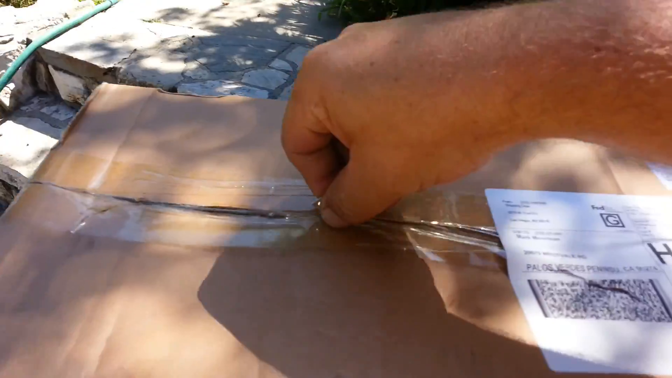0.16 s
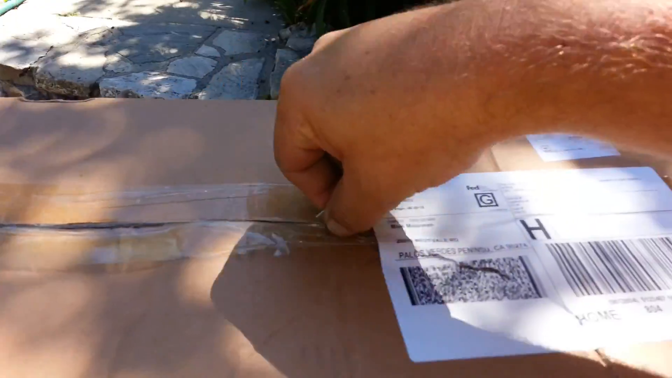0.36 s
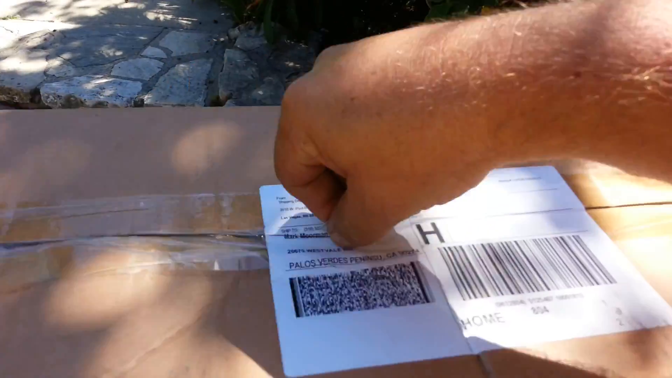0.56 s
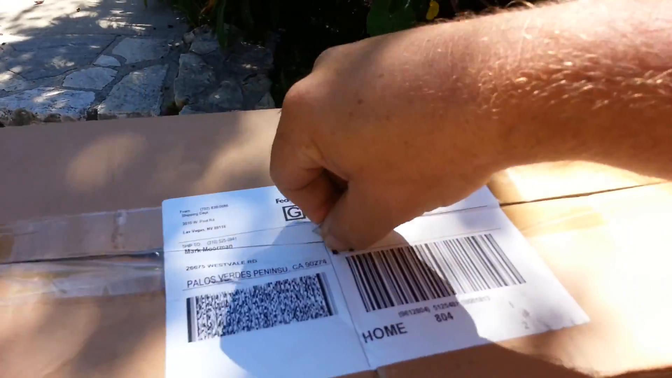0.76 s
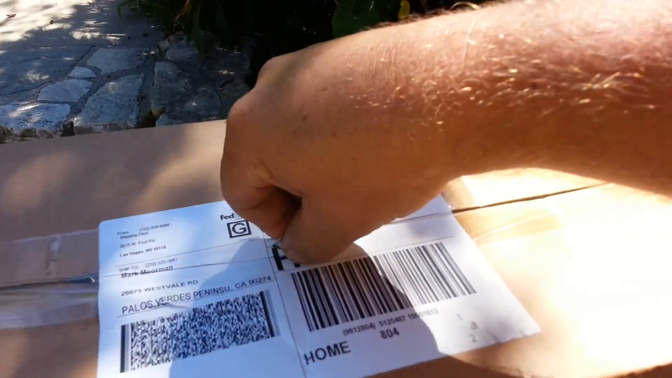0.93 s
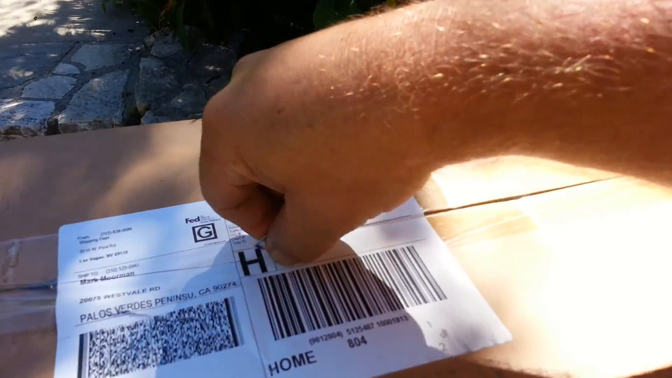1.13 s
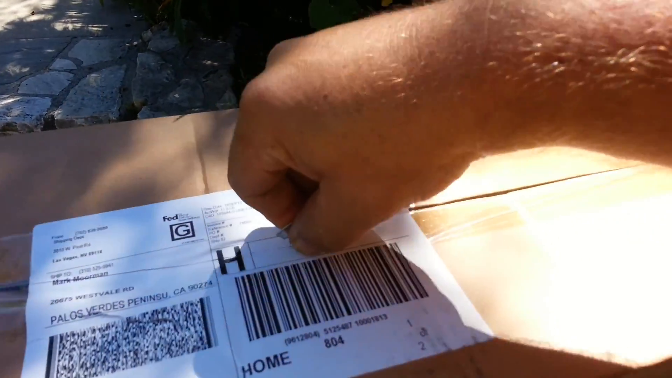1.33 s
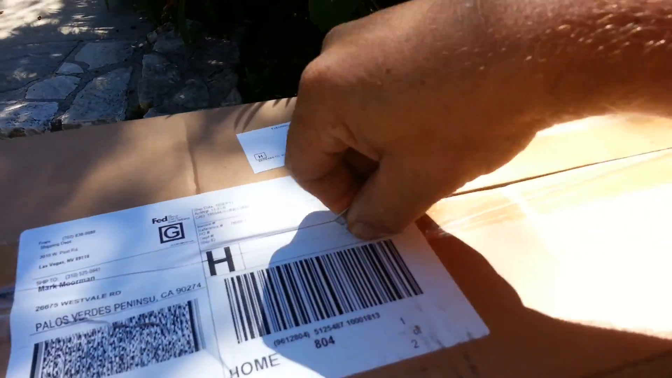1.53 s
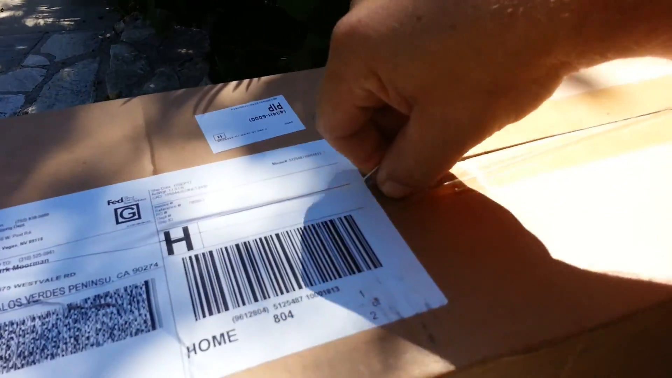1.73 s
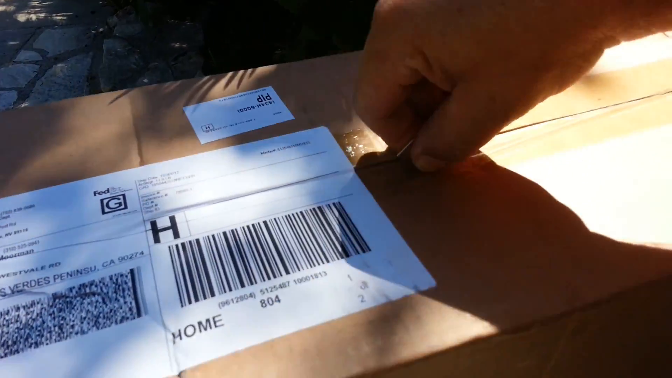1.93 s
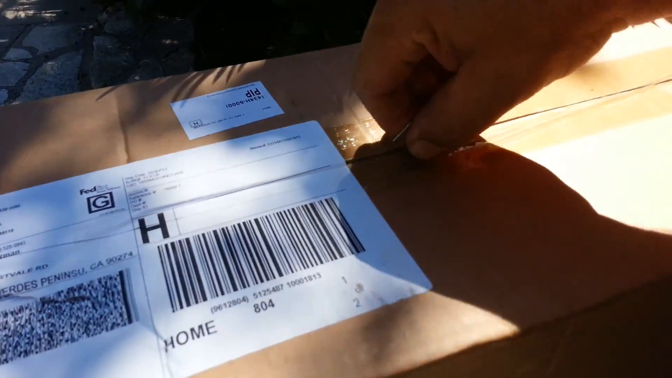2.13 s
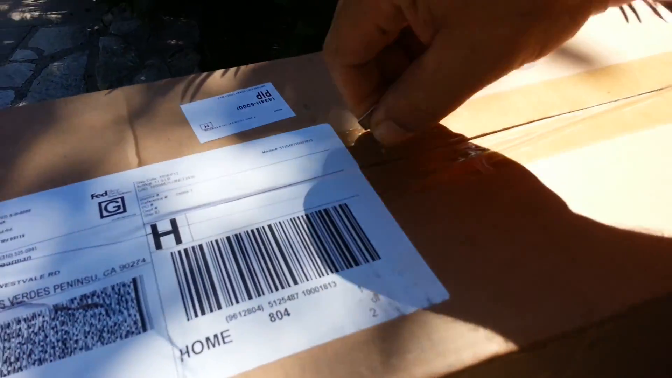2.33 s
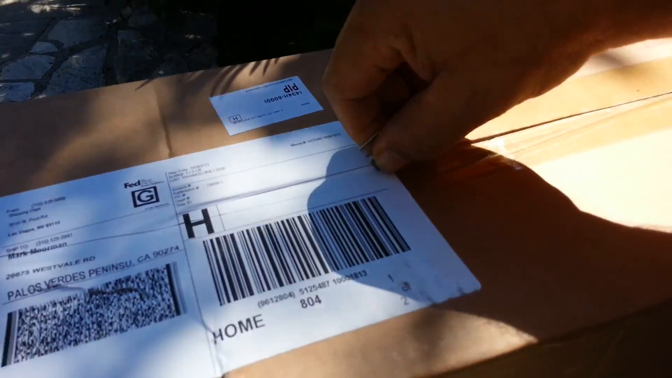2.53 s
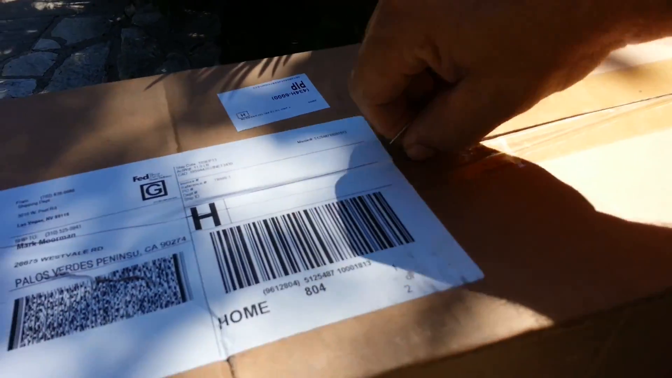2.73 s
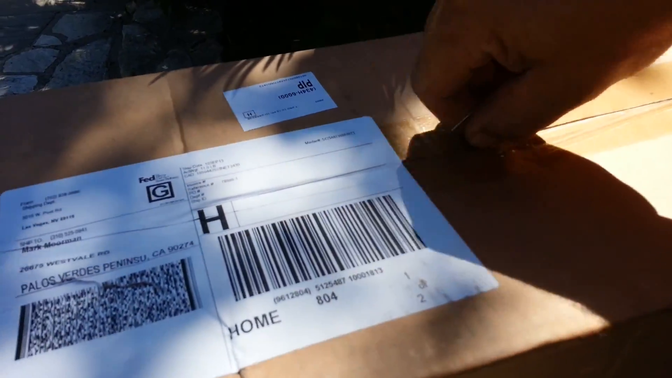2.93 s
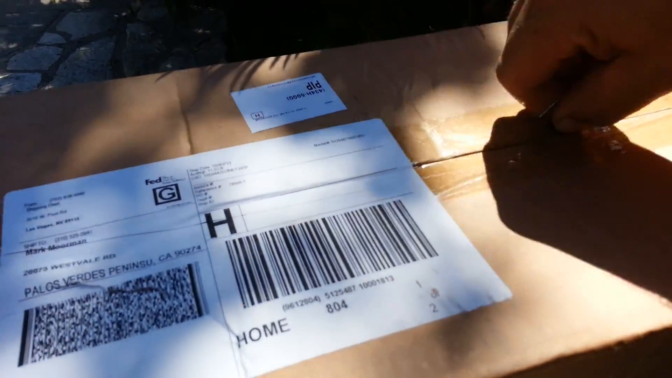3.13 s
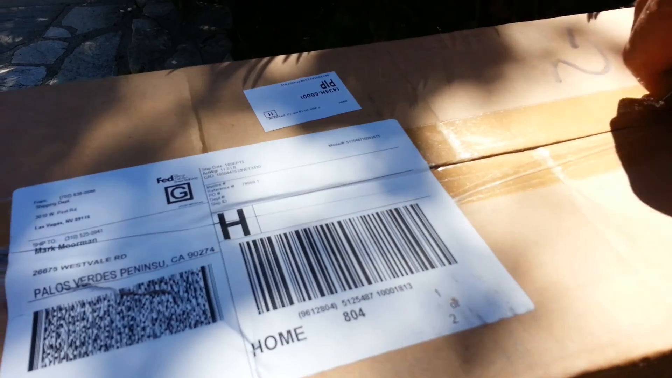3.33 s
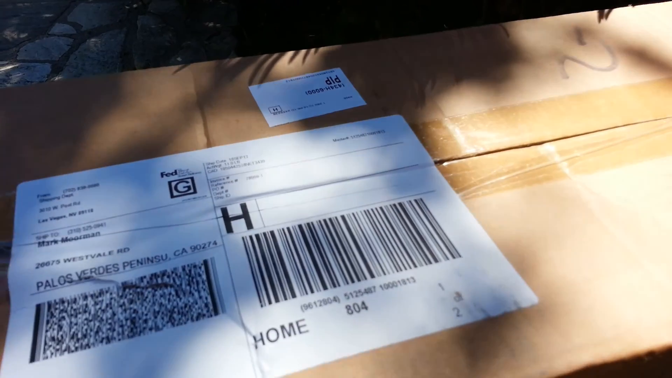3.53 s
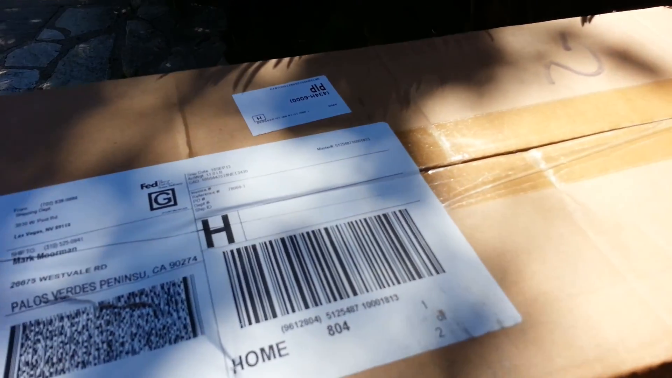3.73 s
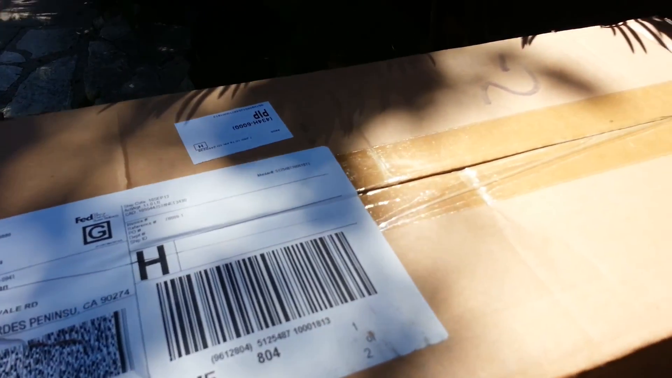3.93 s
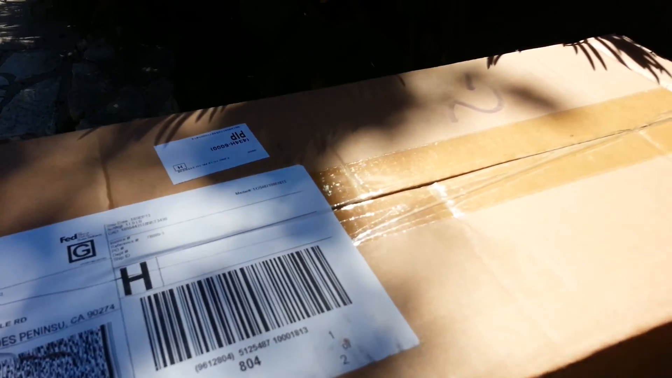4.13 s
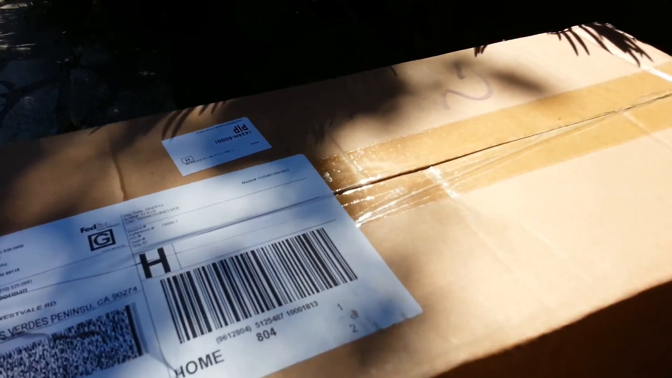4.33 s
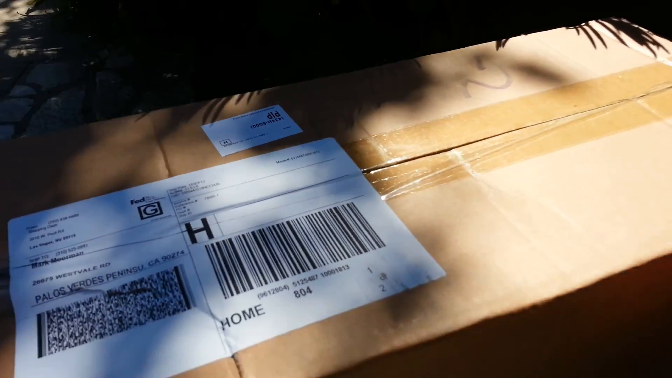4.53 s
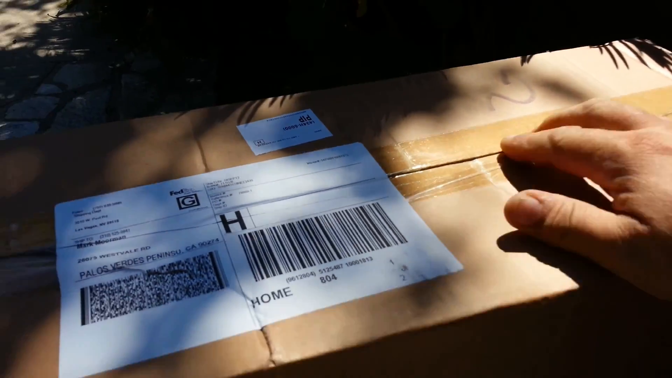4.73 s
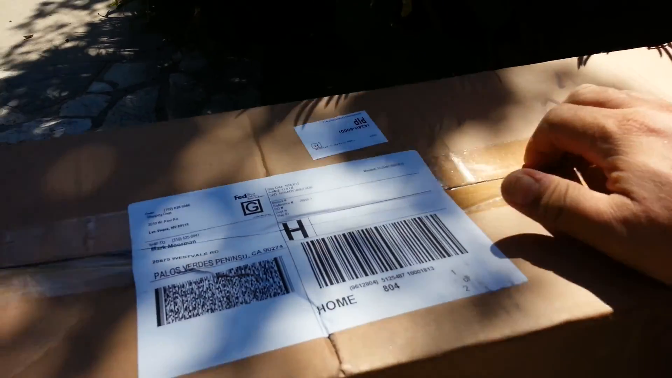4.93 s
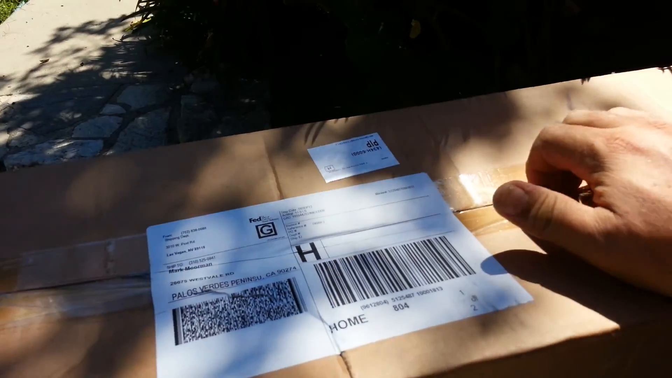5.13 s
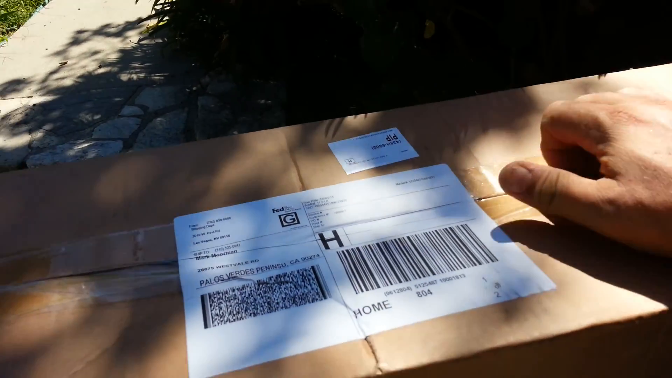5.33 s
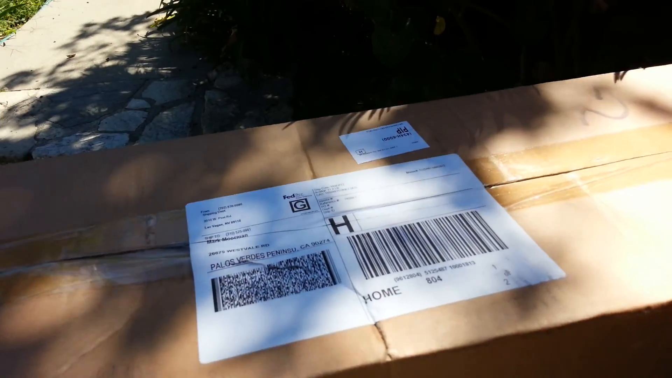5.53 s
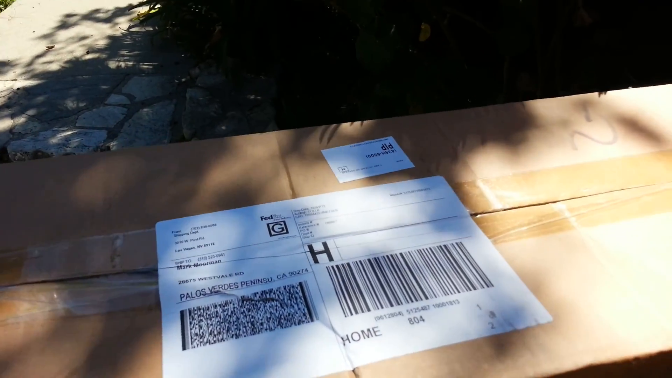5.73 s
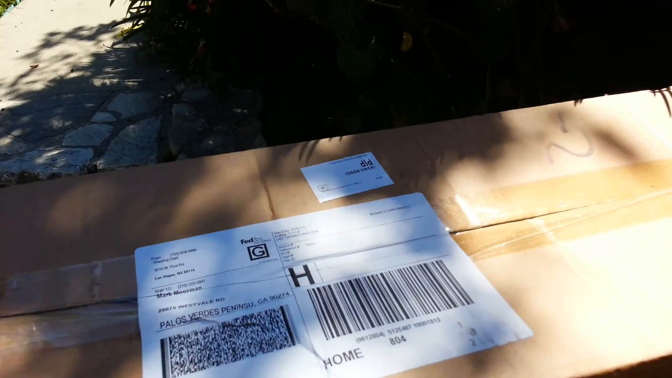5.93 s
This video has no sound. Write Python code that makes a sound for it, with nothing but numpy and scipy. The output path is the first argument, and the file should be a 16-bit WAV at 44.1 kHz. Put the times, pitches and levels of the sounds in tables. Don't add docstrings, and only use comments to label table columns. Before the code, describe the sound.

Clear tape is peeled off a hollow cardboard box in dry rasping, stuttering pulls, then snaps free; the loose strip crackles and a palm thumps and brushes the lid.

```python
import sys
import numpy as np
from scipy import signal
from scipy.fft import rfft, irfft, next_fast_len
from scipy.io import wavfile
from scipy.ndimage import uniform_filter1d, map_coordinates

SR = 44100
rng = np.random.default_rng(int(sys.argv[2]) if len(sys.argv) > 2 else 0)


def how_loud(loudness_db):
    steps = np.asarray(loudness_db, float) / 20
    return 10 ** steps


def master_out(mix):
    frames = np.transpose(np.atleast_2d(mix))
    ceiling = np.clip(frames, -1, 1)
    pcm = np.round(ceiling * 32767).astype(np.int16)
    wavfile.write(sys.argv[1], SR, pcm)


N = 267239
TIME = np.arange(N) / SR

# time in seconds, rasp level in dB.
PICK = [(0, -26), (.06, -76), (.09, -29.5), (.15, -24.5), (.172, -31), (.186, -41), (.21, -33.5),
        (.27, -23), (.35, -30)]
LIFT = [(.45, -25.5), (.57, -17), (0.616, -17), (.635, -23.5), (.645, -20), (.653, -26)]
RIP = [(0.662, -16.5), (.73, -16), (.75, -19.5), (.8, -12.5), (.83, -16.5), (.89, -13), (.92, -17),
       (.94, -16), (0.968, -19), (0.984, -30), (1.01, -43.5)]
TUG = [(1.3, -38.5), (1.47, -32.5), (1.72, -28.5), (1.77, -22.5), (1.8, -30.5), (1.98, -24.5), (2.08, -36),
       (2.171, -25), (2.25, -48.5)]
REGRIP = [(2.36, -41), (2.62, -61), (2.7, -64), (2.74, -42), (2.8, -49), (2.85, -34), (2.95, -33.5),
          (3.05, -28), (3.1, -29)]
HAUL = [(3.191, -20), (3.3, -35), (3.34, -18.5), (3.41, -25), (3.5, -18), (3.57, -21.5), (3.73, -20.5),
        (3.84, -14.5), (3.868, -14.5), (3.88, -22.5)]
REST = [(3.92, -29), (3.96, -45.5), (4.18, -64.5), (4.33, -47.5), (4.58, -60), (4.62, -37.5)]
CRUMPLE = [(4.72, -53), (4.74, -42.5), (4.89, -59), (4.93, -52)]
SLIDE = [(4.99, -31), (5.09, -38), (5.14, -29.5), (5.24, -31.5), (5.275, -42.5), (5.33, -48)]
BRUSH = [(5.41, -30.5), (5.56, -34.5), (5.67, -21.5), (5.72, -21.5), (5.85, -37.5), (6.06, -31)]
STROKES = [PICK, LIFT, RIP, TUG, REGRIP, HAUL, REST, CRUMPLE, SLIDE, BRUSH]
# film ring over rasp in dB, box over rasp in dB, boom over box in dB,
# lid panels in dB, highest hiss in dB.
GRIPS = [(-5, -8, -13, 1, -4), (-8.5, -11, -9, 6.5, -3), (-4, -5.5, -11.5, 8, -3.5), (-5.5, -7, 1, 3, -2.5),
         (-5, -8.5, -30, 3.5, -12), (-5, -10, 3, 1, -6.5), (-7.5, -11.5, -14, 2.5, -21),
         (7.5, -2, -10, 8, -32), (-1.5, -13, -1, 2.5, -2), (-4.5, -10.5, -4, 3, -7)]
# peak in Hz, peak in dB, hollow in Hz, hollow in dB.
STRIP_COLOUR = [(13000, 0.5, 8000, -6.5), (6300, 0.5, 7900, -4), (6300, 0.5, 7000, 0.5),
                (7500, 0, 3150, -4), (7550, -1, 5000, -2), (7400, 3, 3100, -3), (6800, -1, 4100, -1),
                (3500, -2, 4400, 3), (8300, 3.5, 3140, -6.5), (7800, 1, 3750, -0.5)]
# time in seconds, left minus right in dB.
SIDEWAYS = [(0.0, -11), (2.38, -8.5), (3.34, -10.5), (3.68, -7), (5.33, -9.5), (6.06, -6.5)]

# start in seconds, length in ms, rasp in dB, box knock in dB.
CATCHES = [(.009, 12.4, -20.5, -20), (.016, 2.3, -28, -40), (.041, 7.6, -17.5, -13.5), (.05, 10, -28, -26),
           (.064, 13.4, -24.5, -23), (.097, 16, -42, -13), (.107, 10, -22.5, -33), (.191, 8.4, -24.5, -27),
           (.397, 35, -26, -29), (.424, 26, -23, -20.5), (1.001, 52, -30, -27.5), (1.128, 12, -31.5, -33),
           (1.14, 26, -29.5, -32.5), (2.815, 21, -32, -23), (2.828, 20, -25.5, -18), (2.905, 10, -34, -38),
           (2.917, 15, -19, -11.5), (2.928, 22, -18.5, -13), (2.998, 16, -34, -24), (3.7, 47, -40, -14),
           (3.892, 23.5, -20.5, -9)]
# start in seconds, length in ms, rasp in dB, box knock in dB.
TAPS = [(4.604, 12, -46, -18), (4.63, 5.4, -25, -26), (4.731, 12.6, -32.5, -32), (4.791, 48, -47.5, -43),
        (4.945, 40, -30, -25), (5.288, 14.6, -35, -22), (5.366, 22, -39, -28), (5.572, 5.8, -32, -18),
        (5.967, 52, -32.5, -44), (6.005, 9.5, -24, -16), (6.04, 14, -38, -39)]
# start in seconds, length in ms, rasp in dB.
STUTTER = [(1.334, 13, -18), (1.418, 20, -20), (1.476, 22, -21.5), (1.529, 5.4, -18.5), (1.538, 7.6, -21.5),
           (1.58, 15, -20), (1.621, 18, -20.5), (1.652, 30, -24), (1.694, 18.4, -20), (1.732, 24, -22),
           (1.765, 21, -23), (1.81, 25, -21.5), (1.834, 23, -20.5), (1.881, 29, -25), (1.891, 25, -16.5),
           (1.907, 12, -31), (1.934, 12, -17), (1.965, 9.3, -13.5), (1.996, 4, -24), (2.002, 15.6, -17.5),
           (2.048, 3, -18), (2.053, 13.5, -17), (2.097, 20.3, -16.5), (2.149, 23, -20.5)]
# start in seconds, length in ms, rasp in dB.
CHATTER = [(3.108, 8.4, -16), (3.132, 7.9, -13.5), (3.149, 6.2, -15), (3.172, 10, -19), (3.194, 21, -23.5),
           (3.218, 20, -18), (3.25, 14.5, -18), (3.275, 17, -18), (3.313, 24, -18.5), (3.358, 25, -20.5),
           (3.384, 13, -20), (3.412, 14, -17), (3.434, 9.4, -13.5), (3.451, 10, -17.5), (3.468, 18, -19.5),
           (3.487, 16, -18.5), (3.507, 5.8, -16), (3.527, 42, -18), (3.58, 8.6, -20), (3.597, 7.7, -18),
           (3.62, 8.1, -18), (3.64, 8.7, -15.5), (3.661, 13, -17), (3.681, 9.4, -18), (3.697, 16, -16),
           (3.737, 19, -31), (3.793, 9.8, -18), (3.848, 19, -17)]

# start in seconds, peak in dB, pitch in Hz, film ring over peak in dB.
SNAPS = [(.088, -25, 6300, -7), (.099, -16, 5300, 8.5), (.107, -26, 7460, 17), (.122, -25, 13000, 2),
         (.178, -13, 11700, -25), (.1785, -28, 5500, -10), (.193, -28, 7460, 11), (.332, -17, 11500, -8),
         (.333, -16, 6800, 1), (.36, -8.5, 11900, -12), (.382, -14.5, 6560, 4.5), (.398, -15.5, 6500, 1),
         (.403, -23, 8060, -6), (.425, -28, 9000, -13), (.488, -20, 10000, -14), (.541, -11.5, 7200, -35),
         (1.086, -47, 6100, 15), (2.276, -38, 7100, 3), (2.373, -33, 7700, -1), (2.397, -24, 3390, -7),
         (2.431, -36.5, 7300, 4), (2.467, -37, 3480, -18), (2.731, -27.5, 7000, 8.5),
         (2.752, -36, 6000, 16.5), (2.775, -26, 7660, 9), (2.862, -25, 6700, 6), (2.951, -16.5, 8300, 14),
         (2.976, -26, 6000, -4)]
# start in seconds, peak in dB, pitch in Hz, ring over peak in dB.
CRACKLES = [(3.893, -6.5, 6500, -3), (3.977, -9, 6500, -10), (4.003, -25, 5870, 6),
            (4.076, -27.5, 7100, -38), (4.384, -31, 3340, -2), (4.498, -44, 3500, 14),
            (4.605, -17.5, 8700, 8.5), (4.63, -18.5, 6800, 10), (4.662, -27, 10000, -19),
            (4.669, -12.5, 8800, 0.5), (4.715, -22, 8200, 1), (4.732, -16, 9000, -10),
            (4.736, -9, 12000, -15), (4.739, -15, 10000, -7), (4.765, -24, 8300, -2),
            (4.796, -31, 10000, 0), (4.804, -26, 11000, -2), (4.834, -30, 9400, 5.5),
            (4.945, -19.5, 7700, -25), (5.296, -37, 2100, -12), (5.575, -30, 2200, -14),
            (5.368, -27, 8000, -27), (5.862, -14.5, 13000, -8), (5.968, -16.5, 7050, -2.5),
            (6.005, -27.5, 4800, 22.5), (6.05, -11, 6840, 1)]
# start in seconds, peak in dB.
TAUT_SNAPS = [(1.475, -20), (1.529, -15), (1.893, -26), (2.049, -23), (3.134, -25), (3.151, -25),
              (3.249, -14), (3.333, -15), (3.384, -10), (3.471, -14), (3.487, -10), (3.599, -8)]
# start in seconds, peak in dB, pitch in Hz.
POCKS = [(.012, -17, 1970), (.043, -13.5, 1990), (1.088, -32, 1200), (2.396, -32.5, 1140),
         (2.398, -39, 844), (2.933, -13.5, 2000), (2.949, -11.5, 2010), (4.006, -30, 830),
         (4.384, -36, 1230), (4.607, -16, 1700), (4.607, -24.5, 1150), (4.608, -21, 2370),
         (4.632, -31, 2300), (4.67, -23, 1500), (4.8, -31, 2500), (4.8, -30, 1610), (4.96, -27.5, 1990),
         (5.576, -26.5, 814), (6.005, -19, 860)]
# start in seconds, push in dB.
KNOCKS = [(.122, -17.5), (.36, -29), (0.381, -12), (1.894, -10), (2.397, -24.5), (2.729, -11), (1.965, -9),
          (2.1, -11), (2.862, -19), (2.951, -6.5), (3.132, -7), (3.333, -15), (3.696, -12), (4.004, -21.5),
          (4.384, -32), (4.946, -10.5)]
# start in seconds, push in dB.
MORE_KNOCKS = [(.099, -9), (0.257, -16), (.319, -20), (.969, -18), (.98, -22), (1.422, -15.5), (1.696, -14),
               (1.733, -11.5), (3.222, -17.5), (3.277, -15), (3.436, -10), (3.543, -9.5), (3.557, -9.5),
               (3.714, -7.5), (3.903, -11), (4.953, -14), (4.961, -14.5), (5.085, -26)]
# start in seconds, push in dB, rumble in dB.
THUMPS = [
    (0.109, -43, -31),
    (2.73, -35, -33.5),
    (2.946, -32, -21.5),
    (3.897, -26.5, -16),
    (4.961, -28.5, -19),
]

# centre in Hz, width in Hz, level in dB.
FILM = [(1030, 5550, -0.5), (2143, 370, 8)]
# centre in Hz, width in Hz, level in dB.
TAUT = [(1816, 450, -0.5), (6300, 1000, -4)]
# centre in Hz, width in Hz, level in dB.
BOX = [(194, 124, -5.5), (232.7, 49.3, 2), (321.8, 55.5, 1.5), (436, 68, -0.5)]
# centre in Hz, width in Hz, level in dB.
FLAPS = [(506, 66.6, 0), (652, 268, -9), (757.5, 172, -9.5)]
# centre in Hz, width in Hz, level in dB.
CAVITY = [(70, 28, -2), (101, 28, 0), (135, 30, -7)]
# centre in Hz, width in Hz, level in dB.
KNOCK_RING = [(313, 67, 1), (400, 450, -28), (484, 65, -8)]
# frequency in Hz, left in dB, right in dB.
PORTS = [(2470, 7.5, 7), (3040, -0.5, -0.5), (3820, 1.5, -2), (4800, -13, -2.5), (5320, 3.5, -2),
         (7100, -4.5, 7.5), (8300, -4, 1), (9640, -8, -2), (12100, -9, 3), (15400, -21, 3)]
# frequency in Hz, density in dB per Hz.
GARDEN = [(15, -37), (25, -23), (53, -11), (109, -3), (207, 1.5), (309, -16), (344, -16), (515, -13.5),
          (1150, -18.5), (6900, -38.5), (15000, -48)]
# frequency in Hz, left-right likeness from 0 to 1.
ALIKE = [(60, 1), (290, 0.81), (640, 0.52), (1400, 0), (15000, 0)]
# time in seconds, level in dB.
INSECT = [(2.44, -78), (2.46, -54), (2.56, -61), (2.63, -90), (4.48, -90), (4.55, -60), (4.92, -58),
          (4.95, -85)]

TAPE_GONE_S, GRIP_CHANGE_S, LID_LAG_S = 3.95, 0.11, 0.00024
PATCH_DB, STRIP_OCTAVES = 3, 0.17
IDLE_BOX_DB, IDLE_BOOM_DB = -48, -48.5
STUTTER_KNOCK_DB, CHATTER_KNOCK_DB, SNAP_KNOCK_DB = 0.5, 2.5, -23.5
TAUT_SNAP_HZ, TAUT_RING_DB = 7600, -61
RUMBLE_PEAK_S, RUMBLE_RISE_S, RUMBLE_T60_S, RUMBLE_WALLS_DB = 0.019, 0.21, 0.15, -8.5
POCK_CYCLES = 31
TOP_HZ = 14650


def unit(x):
    return x / np.sqrt(np.mean(x ** 2) + 1e-20)


def along(hz, at, values):
    return np.interp(np.log(hz + 1), np.log(np.add(at, 1)), values)


def filtered(x, response):
    m = next_fast_len(N + SR // 4)
    hz = np.fft.rfftfreq(m, 1 / SR)
    return irfft(rfft(x, m) * response(hz), m)[..., :N]


def modes(table):
    def response(f):
        total = 0
        for k, (centre, width, db) in enumerate(table):
            resonance = 1j * f * width / (centre * centre - f * f + 1j * f * width)
            total = total + (-1) ** k * how_loud(db) * resonance
        return total
    return response


def above(hz, edge_hz):
    s = 1j * hz / edge_hz
    return (s * s / (s * s + np.sqrt(2) * s + 1)) ** 2


def ports(hz):
    at, left, right = np.transpose(PORTS)
    return how_loud([along(hz, at, left), along(hz, at, right)])


def wobble(rate):
    knots = rng.standard_normal(int(N * rate / SR) + 4)
    return map_coordinates(knots, [TIME * rate])


def hand():
    rasp_db = np.interp(TIME, *np.concatenate(STROKES).T)
    starts = [stroke[0][0] for stroke in STROKES[1:]]
    which = np.searchsorted(starts, TIME + GRIP_CHANGE_S)
    grip = np.transpose(GRIPS)[:, which] * 1.0
    grip = uniform_filter1d(grip, size=round(GRIP_CHANGE_S * SR), axis=1)
    ring_db, walls_db, air_db, lid_db, sheen_db = grip
    shaking = rumble()
    box_power = how_loud(rasp_db + walls_db) ** 2 + how_loud(IDLE_BOX_DB) ** 2 + how_loud(RUMBLE_WALLS_DB) ** 2 * shaking
    boom_power = how_loud(rasp_db + walls_db + air_db) ** 2 + how_loud(IDLE_BOOM_DB) ** 2 + shaking
    return rasp_db, ring_db, 10 * np.log10(box_power), 10 * np.log10(boom_power), lid_db, sheen_db


def slips():
    tug = [(s, ms, db, db + STUTTER_KNOCK_DB) for s, ms, db in STUTTER]
    haul = [(s, ms, db, db + CHATTER_KNOCK_DB) for s, ms, db in CHATTER]
    return sorted(map(tuple, [*CATCHES, *TAPS, *tug, *haul]))


def bursts(column):
    power = np.zeros(N + SR)
    t = np.arange(SR // 10) / SR
    for row in slips():
        length = row[1] / 1000
        attack = 1 - np.exp(-t / 0.00094)
        plateau = how_loud(-5 * t / length) + 0.39 * how_loud(-60 * t / 0.0038)
        stop = how_loud(-60 * np.maximum(t - length, 0) / 0.023)
        power[round(row[0] * SR):][:len(t)] += (how_loud(row[column]) * attack * plateau * stop) ** 2
    return power[:N]


def sticking(depth_db, ms):
    starts = np.append(np.transpose(slips())[0], 2 * N / SR)
    ahead = starts[np.searchsorted(starts, TIME)] - TIME
    return how_loud(-depth_db * np.exp(-(ahead * 1000 / ms - 1) ** 2))


def fibres(shared, lag_s, spread_db):
    common, left, right = rng.standard_normal((3, N))
    late = np.roll(common, round(lag_s * SR))
    pair = np.sqrt(shared) * np.array([late, common]) + np.sqrt(1 - shared) * np.array([left, right])
    return unit(pair * how_loud(spread_db * wobble(900) + 1.1 * wobble(130)))


def patchy(x, depth_db):
    _, t, z = signal.stft(x, SR, nperseg=256)
    drift = uniform_filter1d(rng.standard_normal(z.shape[1:]), size=24, axis=1)
    shape_after_slip = np.searchsorted(np.transpose(slips())[0], t)
    jumps = rng.standard_normal(z.shape[1:])[:, shape_after_slip]
    field = uniform_filter1d(unit(drift) + 0.82 * jumps, size=3, axis=0)
    return unit(signal.istft(z * how_loud(depth_db * unit(field)), SR, nperseg=256)[1][:, :N])


def strip(x):
    hz, t, z = signal.stft(x, SR, nperseg=256)
    starts = [stroke[0][0] for stroke in STROKES[1:]]
    which = np.searchsorted(starts, t + GRIP_CHANGE_S / 2)
    peak_hz, peak_db, hollow_hz, hollow_db = np.transpose(STRIP_COLOUR)[:, which]

    def bell(centre_hz):
        octaves = np.log2((hz[:, None] + 1) / centre_hz)
        return np.exp(-(octaves / STRIP_OCTAVES) ** 2 / 2)

    gain = how_loud(peak_db * bell(peak_hz) + hollow_db * bell(hollow_hz))
    return signal.istft(z * gain, SR, nperseg=256)[1][:, :N]


def peel():
    rasp_db, ring_db, _, _, lid_db, sheen_db = hand()
    steady = how_loud(rasp_db + 2.2 * (TIME < TAPE_GONE_S) * wobble(45)) * sticking(depth_db=3.5, ms=4.5)
    slip_power = bursts(column=2)
    drive = np.sqrt(steady ** 2 + how_loud(7.0) * slip_power)
    pluck = np.sqrt(steady ** 2 + how_loud(5.5) * slip_power)

    threads = patchy(fibres(shared=0.12, lag_s=.0003, spread_db=2.0), depth_db=PATCH_DB)
    hiss = unit(filtered(threads, lambda f: ports(f) * above(f, 2920)))
    top = filtered(hiss, lambda f: np.abs(above(f, 9800)))
    hiss = hiss + (how_loud(sheen_db) - 1) * top

    threads = patchy(fibres(shared=0.52, lag_s=.00007, spread_db=2.0), depth_db=PATCH_DB)
    film = filtered(threads, modes(FILM))
    film = (film + how_loud(lid_db) * filtered(threads, modes(TAUT))) / np.std(film)
    rubbing = fibres(shared=0.058, lag_s=0, spread_db=1.5)
    skin = unit(filtered(rubbing, modes([(1700, 1660, 0.95), (8340, 1900, 0.13)])))
    body = np.where(TIME < TAPE_GONE_S, film, skin) * how_loud([[-3], [2.5]])
    return strip(drive * hiss + pluck * how_loud(ring_db - 4.0) * body)


def box():
    _, _, box_db, boom_db, lid_db, _ = hand()
    shake = np.sqrt(how_loud(box_db + 0.67 * wobble(60)) ** 2 + how_loud(-11.5) * bursts(column=3))
    force = fibres(shared=1.0, lag_s=.00005, spread_db=4.0)
    force = shake * force / np.std(filtered(force, modes(BOX + FLAPS)))
    slip_pushes = [(row[0], row[-1]) for row in slips()]
    snap_pushes = [(row[0], row[1] + SNAP_KNOCK_DB) for row in all_snaps()]
    for s, db in slip_pushes + snap_pushes:
        force[:, round(s * SR):][:, :30] -= how_loud(db + 13.0) * signal.windows.hann(30)
    walls = filtered(force, lambda f: modes(BOX)(f) * how_loud([along(f, [150, 400], [-1.5, 1.2]), 0 * f]))
    lid = filtered(force * how_loud(0.65 * lid_db), modes(FLAPS[:1]))
    lid = lid - filtered(force * how_loud(1.31 * lid_db), modes(FLAPS[1:]))
    lid = np.array([np.roll(lid[0], round(LID_LAG_S * SR)), lid[1]]) * how_loud([[1.5], [-1.5]])
    sway = unit(filtered(fibres(shared=0.78, lag_s=0, spread_db=1.0), modes(CAVITY))) * how_loud(boom_db - 3.5)
    air = (sway + thumps()) * how_loud([[-1.8], [1.5]])
    return filtered(walls + lid + air, lambda f: above(f, 28.4))


def garden():
    def shape(f):
        likeness = np.clip(along(f, *np.transpose(ALIKE)), -1, 1)
        turn = np.arccos(likeness) / 2
        return how_loud(along(f, *np.transpose(GARDEN))) * np.array([np.cos(turn), np.sin(turn)])

    mid, side = filtered(rng.standard_normal((2, N)), shape)
    return how_loud(-43 + 0.93 * wobble(4.37)) * unit(np.array([mid + side, mid - side]))


def pocks():
    out, t = np.zeros(N + SR), np.arange(SR // 20) / SR
    for s, db, hz in POCKS:
        decay = how_loud(db - 60 * t * hz / POCK_CYCLES)
        out[round(s * SR):][:len(t)] -= decay * np.sin(2 * np.pi * hz * t)
    return out[:N] * how_loud([[-2.5], [2.5]])


def all_snaps():
    taut = [(s, db, TAUT_SNAP_HZ, TAUT_RING_DB) for s, db in TAUT_SNAPS]
    return [*SNAPS, *CRACKLES, *taut]


def snaps():
    out, t = np.zeros((2, N + SR)), np.arange(SR // 25) / SR
    ping_band = signal.butter(1, [900, 2500], "band", fs=SR)
    for s, db, hz, ring_db in all_snaps():
        tick = np.sin(2 * np.pi * hz * t) * how_loud(-60 * t * hz * hz / 1.3e5) * (1 - np.exp(-t * hz * hz / 1.2e4))
        splutter_decay = 0.71 * how_loud(-60 * t / 0.0058) + 0.055 * how_loud(-60 * t / 0.02)
        band_hz = np.clip([hz * 0.61, hz + hz * hz / 14000], 100, 20000)
        splutter = rng.standard_normal((2, len(t))) * splutter_decay
        splutter = signal.lfilter(*signal.butter(2, band_hz, "band", fs=SR), splutter)
        crack = 0.16 * np.diff(rng.standard_normal((2, len(t) + 1))) * how_loud(-60 * t / 0.0017)
        ping = signal.lfilter(*ping_band, 1.92 * rng.standard_normal(len(t)))
        ping = how_loud(ring_db - 6.0) * ping * how_loud(-60 * t / 0.014)
        snap = how_loud(db) * (3.26 * tick + 1.77 * splutter + ping + crack)
        out[:, round(s * SR):][:, :len(t)] += snap * how_loud([[-4], [3]])
    return out[:, :N]


def knocks():
    push = np.zeros(N)
    for s, db in [*KNOCKS, *MORE_KNOCKS]:
        push[round(s * SR):][:40] += how_loud(db + 13.5) * signal.windows.hann(40)
    return filtered(push, modes(KNOCK_RING)) * how_loud([[.5], [-.5]])


def thumps():
    jolt = np.zeros(N)
    for s, db, _ in THUMPS:
        jolt[round(s * SR):][:220] += how_loud(db + 23.5) * signal.windows.hann(220)
    return -filtered(jolt, modes([(85.5, 81, -4.5), (237.7, 18, 5.5)]))


def rumble():
    power = np.zeros(N)
    for s, _, db in THUMPS:
        since = TIME - s - RUMBLE_PEAK_S
        power += how_loud(db - 60 * np.maximum(since / RUMBLE_T60_S, -since / RUMBLE_RISE_S)) ** 2
    return power


def insect():
    buzz = unit(filtered(rng.standard_normal((2, N)), lambda f: modes([(3500, 380, 0)])(f) ** 2))
    return buzz * how_loud(np.interp(TIME, *np.transpose(INSECT)) + 1.5 * wobble(60))


def twangs():
    jerks = np.zeros(N)
    for s, _, rasp_db in CHATTER:
        jerks[round(s * SR) + 90] = how_loud(rasp_db + 11 + 2 * rng.standard_normal())
    return filtered(jerks, lambda f: modes(FILM[1:])(f) ** 2) * how_loud([[-3], [2.5]])


def scene():
    lean_db = np.interp(TIME, *np.transpose(SIDEWAYS)) + 8
    tape = peel() + snaps() + twangs() + pocks()
    return tape * how_loud([1.24 * lean_db, -.2 * lean_db]) + box() + knocks() + garden() + insect()


def band_limit(x):
    return signal.sosfilt(signal.butter(12, 15680, fs=SR, output="sos"), x)


def record(dry):
    clipped = dry / (1 + np.abs(dry / .93) ** 5) ** (1 / 5)
    mix = filtered(clipped, lambda hz: how_loud(np.interp(hz - TOP_HZ, [-150, 100, 1000], [0, -36, -48])))
    return band_limit(mix)


dry = scene()
out = record(dry)
master_out(out)
```